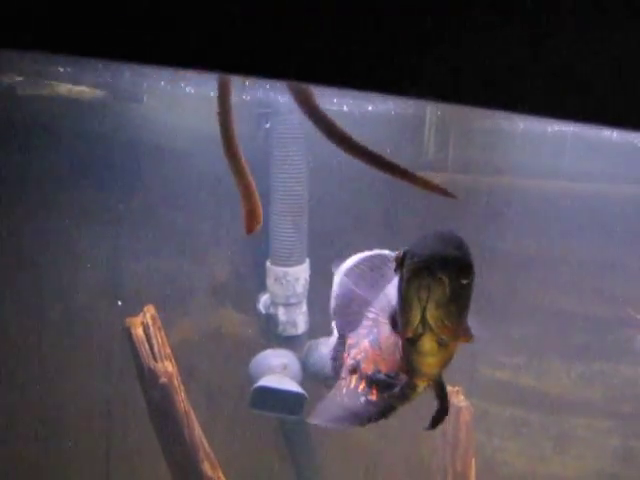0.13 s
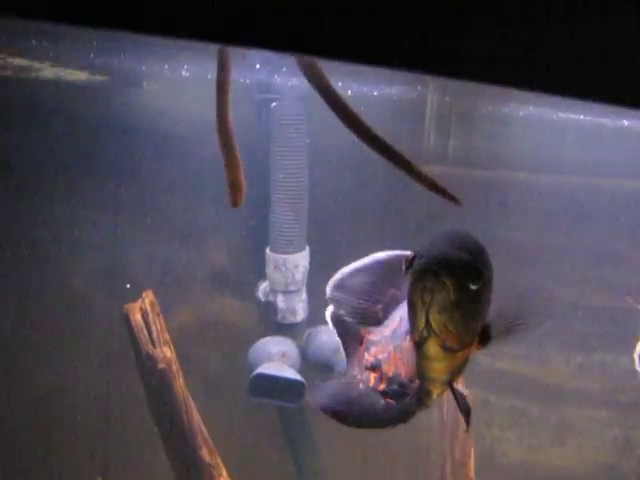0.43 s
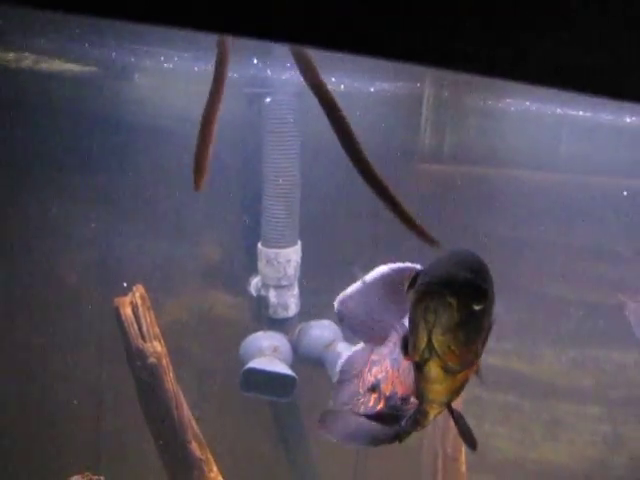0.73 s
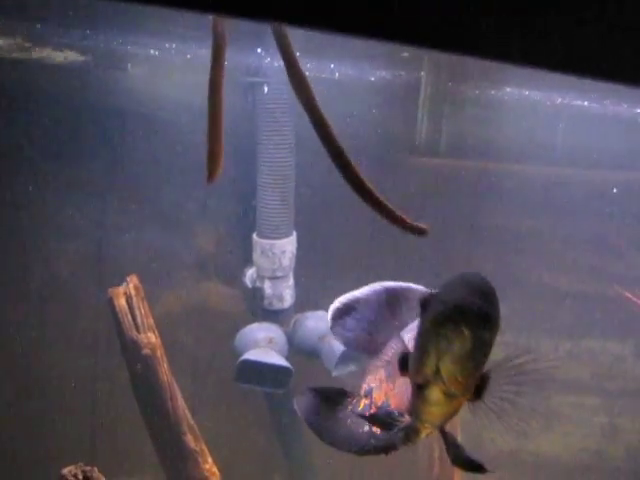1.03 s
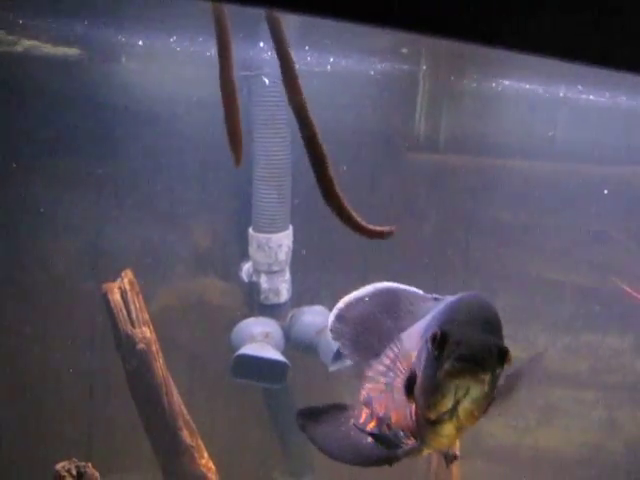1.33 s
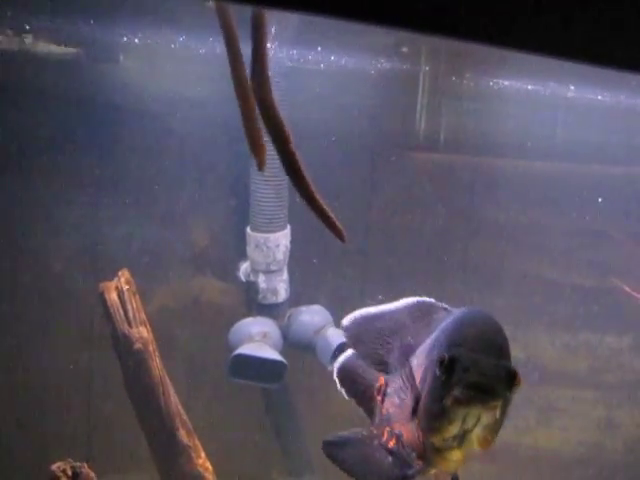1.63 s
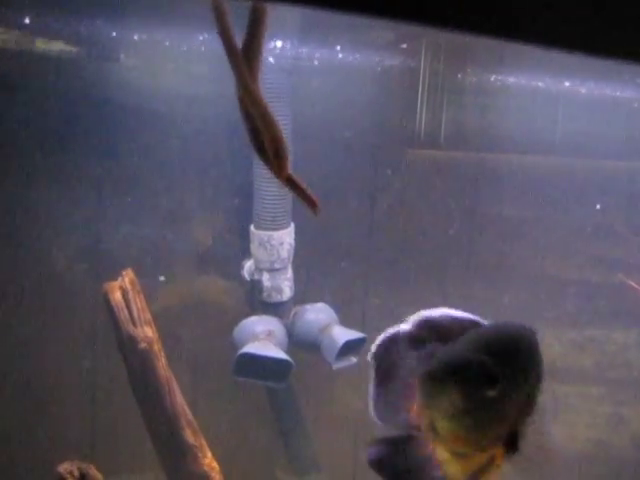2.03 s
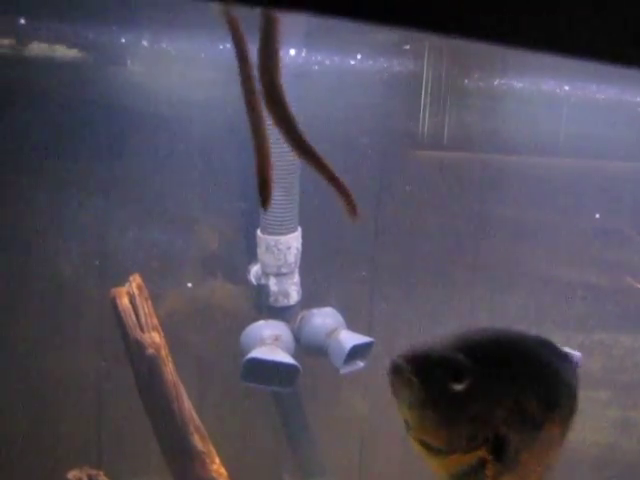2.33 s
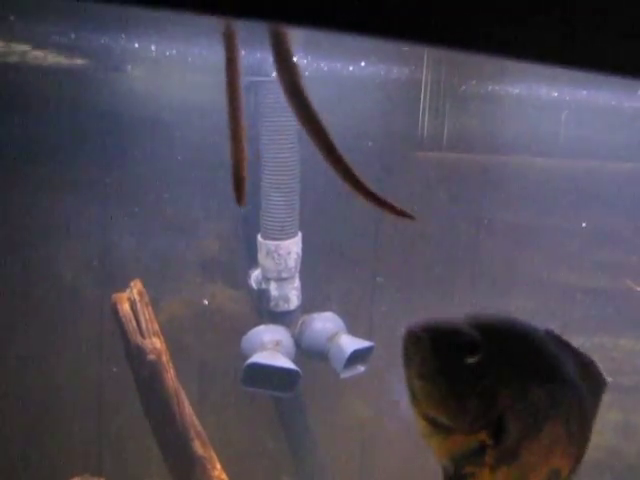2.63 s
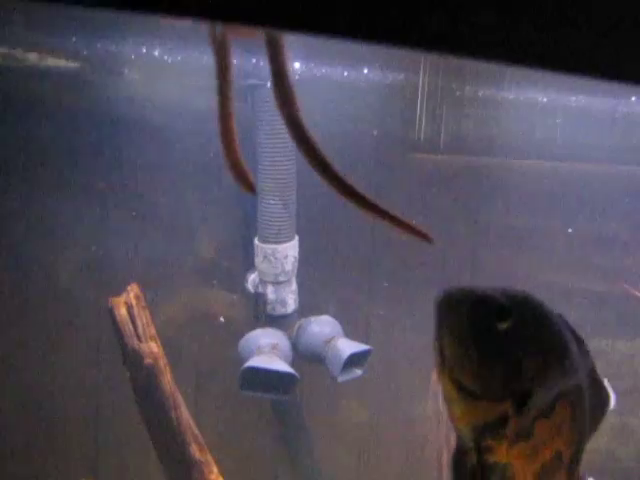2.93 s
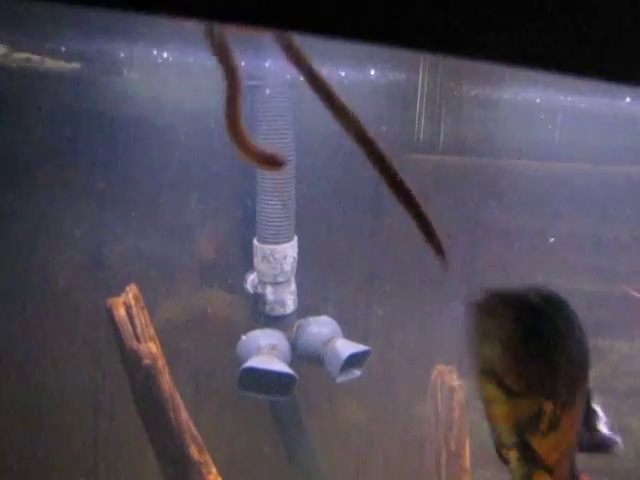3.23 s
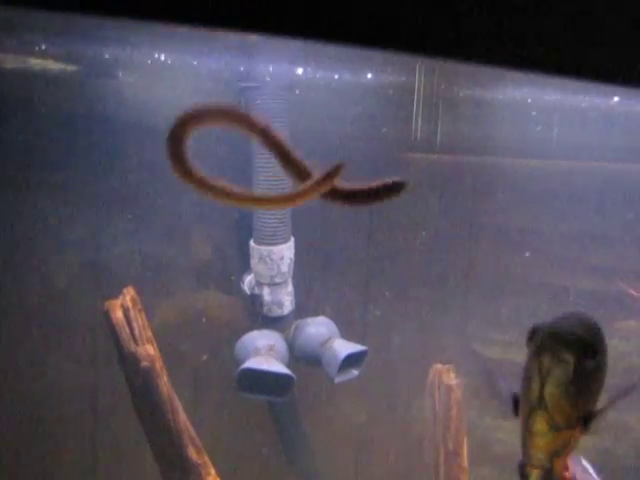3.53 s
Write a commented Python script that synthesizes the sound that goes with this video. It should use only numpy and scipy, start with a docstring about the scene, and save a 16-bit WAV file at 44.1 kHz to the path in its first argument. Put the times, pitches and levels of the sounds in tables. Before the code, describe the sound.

An aquarium filter pump drones throughout on one low, even pitch, its strength fluttering unevenly and fullest around 1.6 seconds. Dull water murmur and a fine trickle run underneath, leaning slightly right. Soft gurgles blip near 1.0, 1.2, 2.0 and 2.6 seconds, with a clearer one at 3.6. Faint, crisp bubble ticks come near 0.1, 0.25, 1.3-1.4, 3.0, 3.3 and 3.7. Close listening, small quiet room.

```python
"""Aquarium filter pump

A filter pump hums steadily in a quiet room, heard from close to the glass.
The hum is a sum of sines at rotor orders and mains multiples; one order stands far above most others.
Water murmurs underneath as shaped noise, noise-driven resonances and decaying bubble tones.
A few small bubbles pop at the surface: a short ring and a noise snap, with an echo and a room tail."""
import sys
import numpy as np
from scipy import signal
from scipy.fft import rfft, irfft
from scipy.io import wavfile
from scipy.ndimage import uniform_filter1d

SR = 44100
rng = np.random.default_rng(int(sys.argv[2]) if len(sys.argv) > 2 else 0)


def generate_wav(sig):
    """Save sig (samples, or channels by samples) to the path in sys.argv[1] as 16-bit PCM at SR."""
    pcm = np.round(np.clip(np.atleast_2d(sig).T, -1, 1) * 32767).astype(np.int16)
    wavfile.write(sys.argv[1], SR, pcm)


N = 163170

ROTOR_HZ, MAINS_HZ = 21.86, 60
DRONE_ORDER, THROB_ORDER, WHINE_ORDER = 8, 5, 18
DRONE_TRIM_DB, THROB_TRIM_DB, WHINE_TRIM_DB = 0, -0.5, -1  # added to the level curves
SWELL_WAVER = 0.04  # share of the amplitude
PATCH_DB, FLICKER_DB = 0.8, 1.46  # rms depths of the level changes in wash and tank
LEAN_DB = -0.85  # left minus right level of the water; negative leans right
BUBBLE_GLIDE = 0.04  # share of the pitch, either side of its centre
POP_RISE_S, SNAP_DECAY_S = 0.0003, 0.0013
SNAP_LOW_SHARE = 0.28  # the snap's band starts at this share of its top
LID_ECHO_S, LID_ECHO_DB = 0.0028, -8
ROOM_T60_S = 0.22
GURGLE_RISE_S, GURGLE_DECAY_S = 0.00061, 0.0094
TRICKLE_PER_S, TRICKLE_LOW_HZ, TRICKLE_TOP_HZ = 60, 875, 1450
TRICKLE_FLOOR_DB, TRICKLE_SPREAD_DB = -52.5, 3  # lowest level before panning, and scale of the rise above it
TRICKLE_CYCLES = 2.56  # decay time in periods of the pitch
EDGE_HZ = 15700


def amp(db):
    """Level law: decibels to amplitude gain."""
    return 10 ** (np.asarray(db) / 20)


def unit(x):
    """Normalisation: scales a signal to rms 1."""
    return x / np.sqrt(np.mean(abs(x) ** 2) + 1e-20)


def read(points, hz):
    """Interpolation of a spectrum along a log-frequency axis."""
    f, value = np.transpose(points)
    return np.interp(np.log(hz + 1), np.log(f + 1), value)


def add(mix, start_s, sound):
    """Superposition: adds a sound to the stereo mix, cut off at its end."""
    part = mix[:, round(start_s * SR):][:, :sound.shape[1]]
    part += sound[:, :part.shape[1]]


def drift(rate_hz):
    """Slow random motion of rms 1: sines of random phase, weaker as they get faster, up to the rate."""
    t = np.linspace(0, N / SR, num=400)
    f = np.geomspace(rate_hz / 20, rate_hz, num=20)[:, None]
    sines = np.sin(2 * np.pi * (f * t + rng.random(f.shape)))
    slow = (sines / np.sqrt(f)).sum(0)
    return np.interp(np.arange(N) / SR, t, unit(slow - slow.mean()))


def line(hz, db, waver):
    """Complex modulation: a tone whose strength and phase wander slowly."""
    sway = unit(1 + waver * (drift(rate_hz=4.095) + 1j * drift(rate_hz=3.16)))
    carrier = np.exp(2j * np.pi * (hz * np.arange(N) / SR + rng.random()))
    return np.sqrt(2) * amp(db) * (sway * carrier).real


def pair(gain, same):
    """Mid-side mixing: stereo noise of a given spectrum and left-right correlation."""
    mid, side = rfft(rng.standard_normal((2, N)))
    same = np.clip(same, -1, 1)
    mid = mid * np.sqrt((1 + same) / 2)
    side = side * np.sqrt((1 - same) / 2)
    return irfft(np.array([mid + side, mid - side]) * gain, N)


def wash():
    """Spectral shaping: noise of water and room, with small drifting patches in time and frequency."""
    # power density of the wash: frequency_hz, level_db (per Hz)
    wash_density = [(20, -82), (60, -76.5), (140, -70), (240, -71.5), (450, -74.5), (640, -75.5),
                    (700, -85), (850, -82), (1000, -85.5), (1400, -91), (1650, -92), (2300, -93),
                    (3600, -95.5), (4600, -100), (6500, -101), (9000, -106), (13000, -110), (16000, -114)]
    # left-right correlation: frequency_hz, likeness (1 = same, 0 = independent)
    wash_likeness = [(30, 1), (100, 0.61), (500, 1), (1000, 0.65), (1800, 0.4), (3000, 0), (15000, 0)]
    hz = np.fft.rfftfreq(N, 1 / SR)
    noise = pair(amp(read(wash_density, hz)) * np.sqrt(SR / 2), read(wash_likeness, hz))
    z = signal.stft(noise, nperseg=512)[2]
    # neighbouring bins and frames share a level; both channels share the patches
    patches = rng.standard_normal(z.shape[1:])
    patches = uniform_filter1d(patches, size=8, axis=0)
    patches = unit(uniform_filter1d(patches, size=10, axis=1))
    return signal.istft(z * amp(PATCH_DB * patches))[1][:, :N]


def tank():
    """Forced resonance: turbulent flow stirs tank and housing, each mode fluttering by itself."""
    # modes of tank and housing: centre_hz, width_hz, level_db, likeness (left-right, 0 to 1)
    modes = [(196, 13, -47.5, 0.71), (287, 40, -56, 1), (516, 24, -54.5, 0.96), (599, 52, -50, 1),
             (777, 39, -59, 0.89), (1231, 140, -57, 0.88), (1394, 90, -62, 0.6), (2663, 40, -69.5, .3),
             (6300, 250, -97, 0)]
    hz = np.fft.rfftfreq(N, 1 / SR)
    out = np.zeros((2, N))
    for centre, width, db, same in modes:
        response = 1 / (1 + ((hz - centre) / width) ** 2 * 2)
        ring = pair(response, same)
        flutter = amp(FLICKER_DB * drift(rate_hz=30))
        out += amp(db) * unit(ring * flutter)
    return out


def bubble(hz, rise_s, decay_s):
    """Damped oscillation: an air pocket rings for a moment, rising in pitch; peak 1."""
    t = np.arange(SR // 20) / SR
    pitch = hz * (1 + BUBBLE_GLIDE * np.tanh(t / decay_s - 1))
    envelope = np.exp(-t / decay_s) * (1 - np.exp(-t / rise_s))
    ring = np.sin(2 * np.pi * np.cumsum(pitch) / SR) * envelope
    return ring / abs(ring).max()


def water():
    """Random superposition: soft gurgles of returning water over a trickle of smaller bubbles."""
    # gurgles, before the lean to the right: start_s, pitch_hz, level_db (peak)
    gurgles = [(.043, 530, -38), (.954, 580, -40), (1.016, 608, -35), (1.202, 611, -35.5),
               (2.024, 615, -35.5), (2.197, 560, -41), (2.445, 1220, -42.5), (2.626, 608, -34.5),
               (3.638, 592, -29.5)]
    out = np.zeros((2, N))
    for start_s, hz, db in gurgles:
        add(out, start_s, amp(db) * bubble(hz, GURGLE_RISE_S, GURGLE_DECAY_S)[None])
    for when, size, strength, side in rng.random((round(TRICKLE_PER_S * N / SR), 4)):
        hz = TRICKLE_LOW_HZ * (TRICKLE_TOP_HZ / TRICKLE_LOW_HZ) ** size
        db = TRICKLE_FLOOR_DB - TRICKLE_SPREAD_DB * np.log(max(strength, .05))
        drop = amp(db) * bubble(hz, GURGLE_RISE_S, TRICKLE_CYCLES / hz)
        add(out, when * N / SR, drop * np.sqrt([[side], [1 - side]]))  # equal-power pan
    return out


def pop(hz, ring_db, decay_s, snap_db, top_hz):
    """Film rupture: a film snaps as band noise and the tiny cavity under it rings."""
    ring = bubble(hz, POP_RISE_S, decay_s)
    t = np.arange(len(ring)) / SR
    band = signal.butter(4, [SNAP_LOW_SHARE * top_hz, top_hz], "band", fs=SR)
    noise = unit(signal.lfilter(*band, rng.standard_normal(len(t))))
    snap = noise * np.exp(-t / SNAP_DECAY_S)
    return amp(ring_db) * ring + amp(snap_db) * snap


def bubbles():
    """Reflection and reverberation: the pops, their bounce off the lid and a short room tail."""
    # pops: start_s, pitch_hz, ring_db (peak before pan), ring_decay_s, snap_db (before decay and pan),
    # snap_top_hz, room_db (tail relative to the pop), pan_db (left minus right)
    pops = [(0.1052, 11000, -48.5, .0004, -56, 15500, -3, -5),
            (.253, 12800, -52, .0005, -68, 15500, -3, -2), (1.317, 5900, -52, .0007, -44.5, 7200, 0, 0),
            (1.4135, 7080, -40, .0007, -55, 12500, 0, -1.5),
            (3.0175, 3500, -38.5, .0012, -52, 9000, -1, 1.5),
            (3.2725, 13800, -42, .0004, -48, 14800, -11, -1.5),
            (3.6823, 9600, -39.5, 0.00034, -53, 11700, -3, -1)]
    out = np.zeros((2, N))
    t = np.arange(SR // 2) / SR
    for start_s, *shape, room_db, pan_db in pops:
        sound = pop(*shape) * amp([[pan_db / 2], [-pan_db / 2]])
        tail = rng.standard_normal((2, len(t))) * np.exp(-np.log(1000) * t / ROOM_T60_S)
        tail = tail / np.linalg.norm(tail[0])
        add(out, start_s, sound)
        add(out, start_s + LID_ECHO_S, amp(LID_ECHO_DB) * sound)
        add(out, start_s, amp(room_db) * signal.fftconvolve(sound, tail, axes=1))
    return out


def pump():
    """Harmonic series: rotor orders and mains buzz; three of the orders swell and sink."""
    # level curves of the swelling orders, before their trims: time_s, level_db
    drone_curve = [(0.0, -39), (0.49, -33), (0.65, -38.5), (0.75, -31), (0.85, -38), (1.0, -30.5),
                   (1.09, -38), (1.15, -31), (1.28, -36), (1.38, -31), (1.5, -34), (1.64, -27),
                   (1.76, -31.5), (1.93, -34), (1.97, -41), (2.05, -34.5), (2.36, -31.5), (2.45, -35),
                   (2.53, -30.5), (2.69, -37), (2.82, -32.5), (2.9, -40.5), (3.01, -31.5), (3.1, -37.5),
                   (3.19, -33.5), (3.37, -39.5), (3.5, -34.5), (3.7, -42)]
    throb_curve = [(0.0, -72), (0.05, -44), (0.65, -49), (1.85, -40.5), (3.67, -48), (3.7, -41)]
    whine_curve = [(0.0, -49.5), (0.79, -45.5), (1.19, -65.5), (1.72, -44), (1.75, -50.5), (2.33, -43.5),
                   (2.5, -49), (3.65, -44), (3.7, -49)]
    # steadier rotor lines: order, level_db, waver (share of the amplitude)
    rotor_lines = [(1, -58, 0.22), (2, -61, .2), (3, -50, 0.033), (4, -48, 0.23), (6, -83, 0.23),
                   (7, -53, 0.55), (9, -47.5, 1), (10, -53, 0.083), (12, -66, 0.39), (14, -55.5, 0.88),
                   (16, -63, .3)]
    # mains lines: multiple, level_db, waver (share of the amplitude)
    mains_lines = [(1, -59.5, .15), (2, -55.5, 0.18), (4, -63, 0.15), (5, -52.5, 0.26), (6, -65, 0.21),
                   (8, -61.5, 0.59), (10, -54, 0.17), (12, -61.5, 0.22)]
    swells = ((DRONE_ORDER, drone_curve, DRONE_TRIM_DB),
              (THROB_ORDER, throb_curve, THROB_TRIM_DB),
              (WHINE_ORDER, whine_curve, WHINE_TRIM_DB))
    hum = np.zeros(N)
    for order, curve, trim_db in swells:
        level = np.interp(np.arange(N) / SR, *np.transpose(curve))
        hum += line(order * ROTOR_HZ, level + trim_db, SWELL_WAVER)
    for base_hz, lines in ((ROTOR_HZ, rotor_lines), (MAINS_HZ, mains_lines)):
        for order, db, waver in lines:
            hum += line(order * base_hz, db, waver)
    return hum


def scene():
    """Level-difference panning: hum in the middle, water a little to the right."""
    flow = wash() + tank() + water()
    return flow * amp([[LEAN_DB / 2], [-LEAN_DB / 2]]) + bubbles() + pump()


def record(dry):
    """Linear-phase low-pass filtering: the recorder's band limit."""
    lowpass = signal.firwin(511, EDGE_HZ, window=("kaiser", 9), fs=SR)
    return signal.oaconvolve(dry, lowpass[None], "same", axes=1)


dry = scene()
out = record(dry)
generate_wav(out)
```